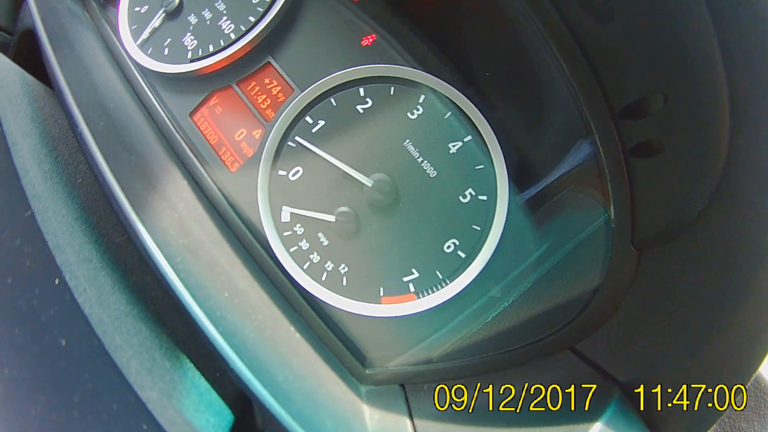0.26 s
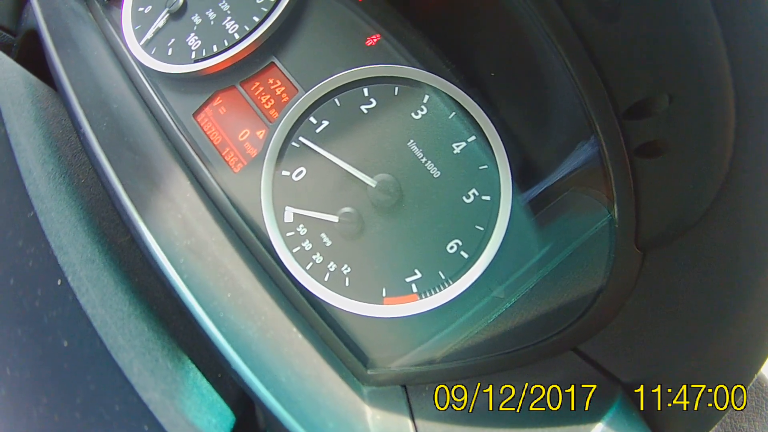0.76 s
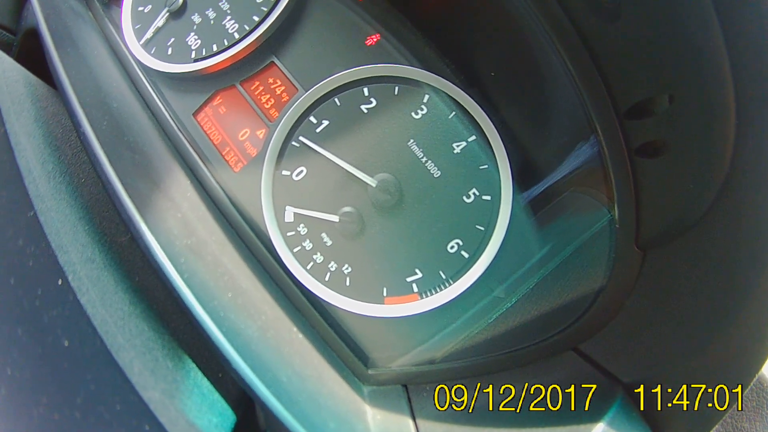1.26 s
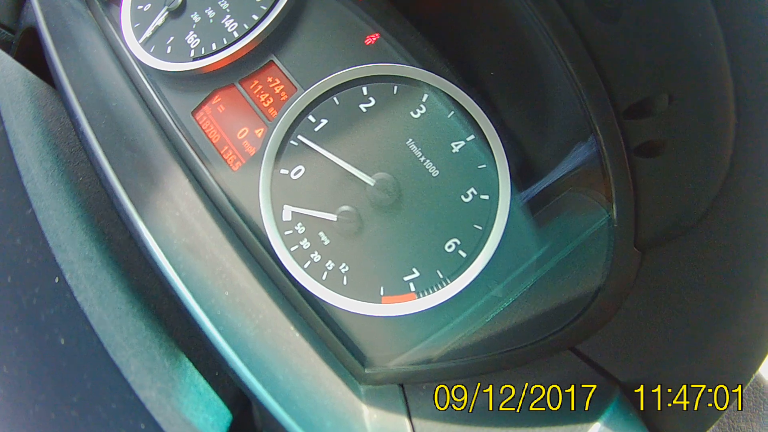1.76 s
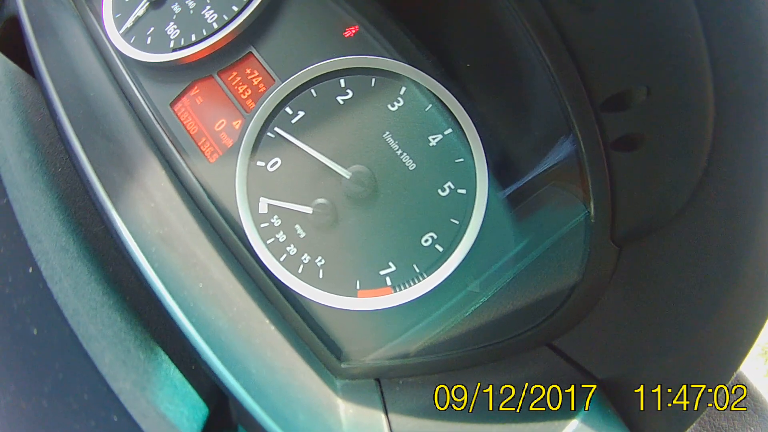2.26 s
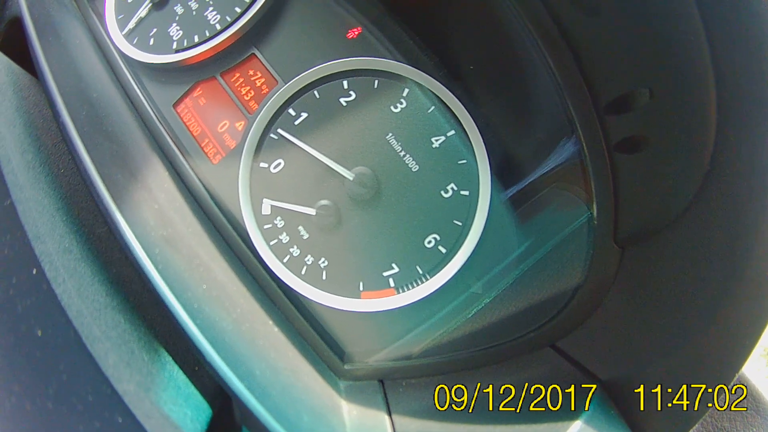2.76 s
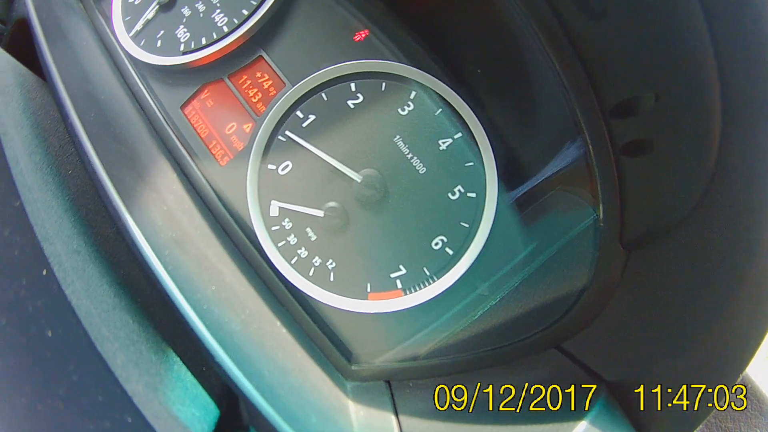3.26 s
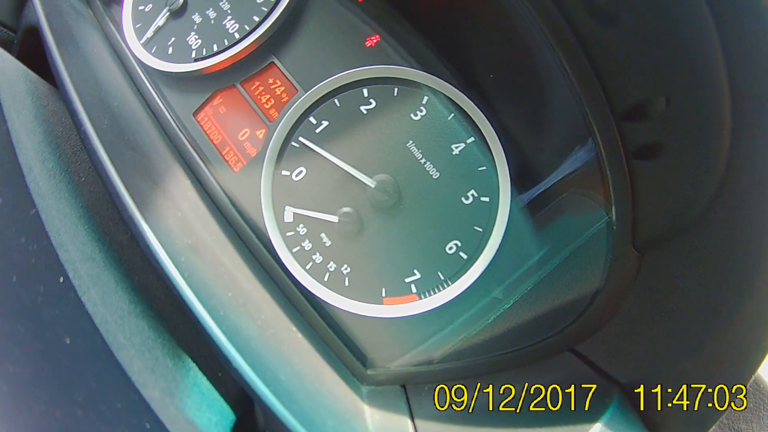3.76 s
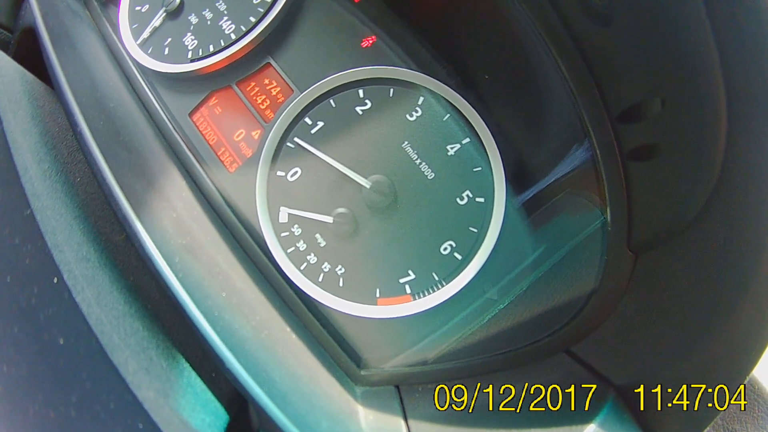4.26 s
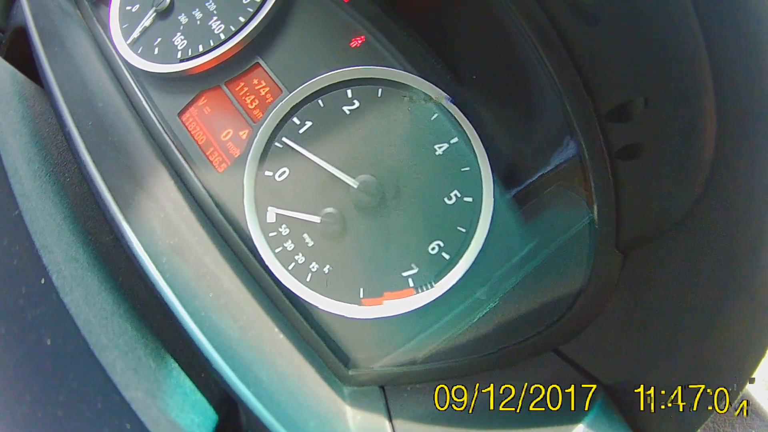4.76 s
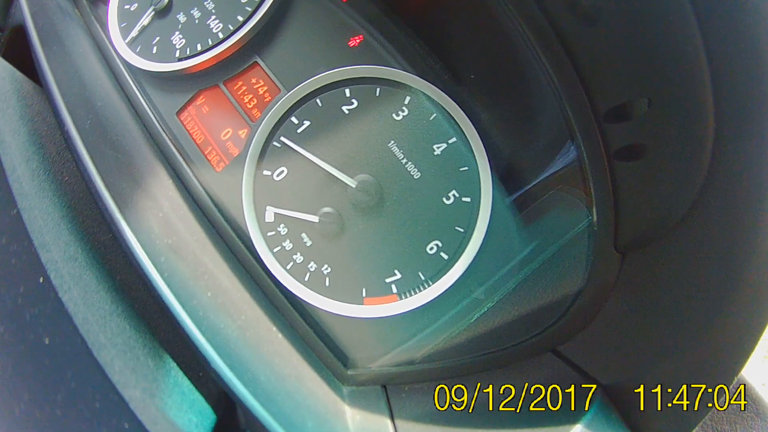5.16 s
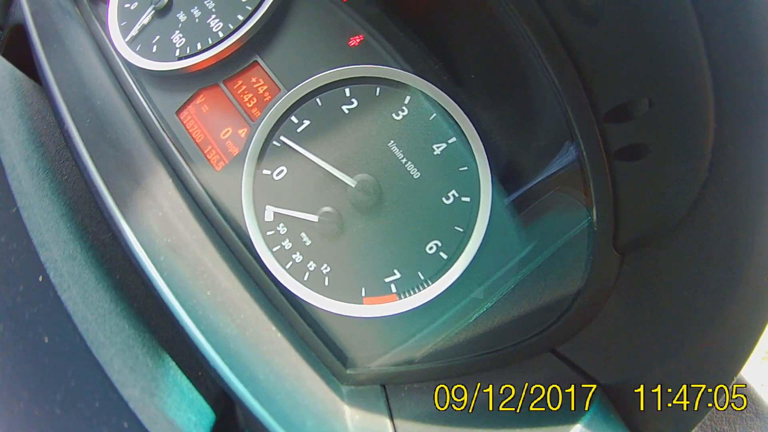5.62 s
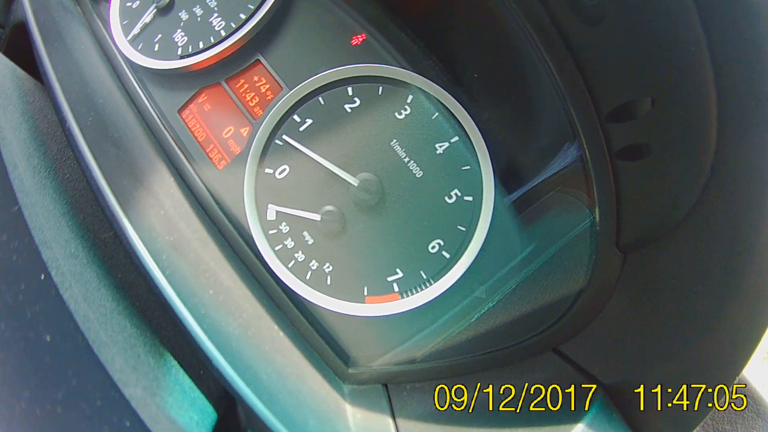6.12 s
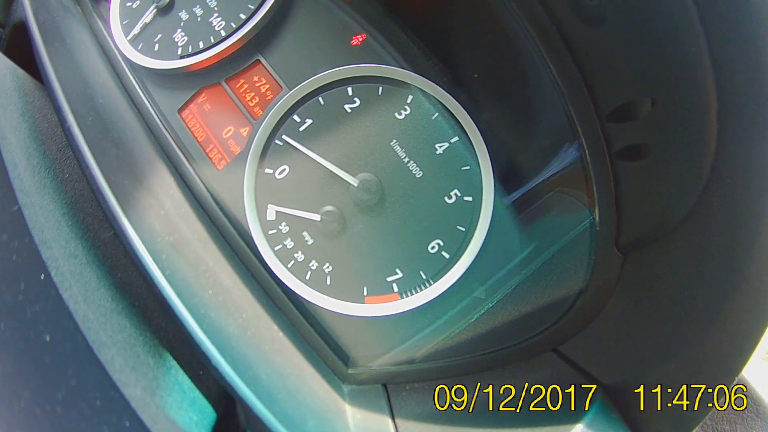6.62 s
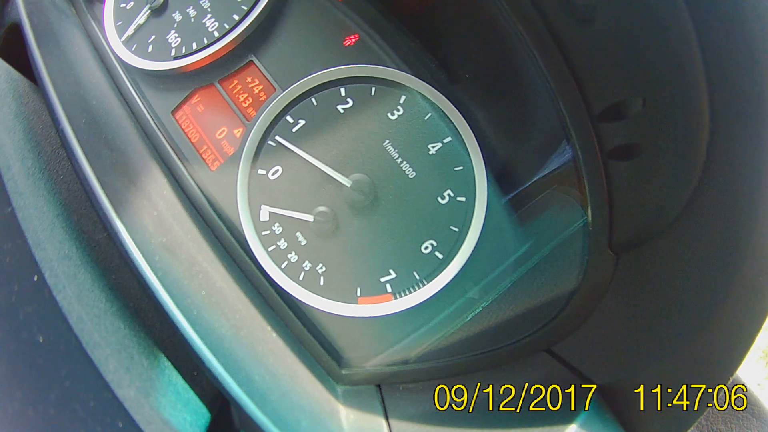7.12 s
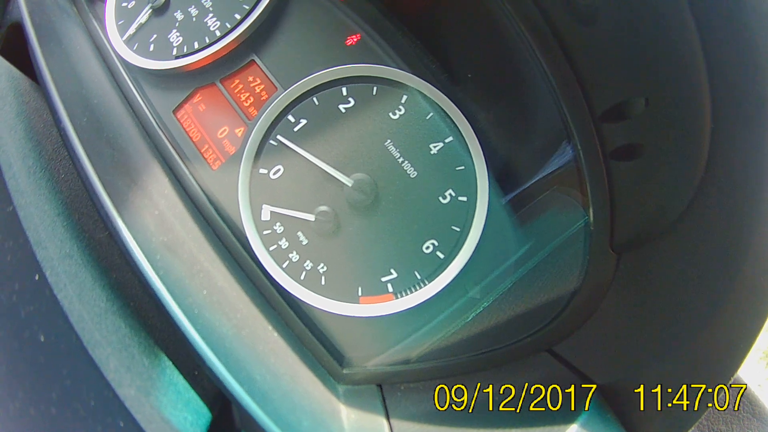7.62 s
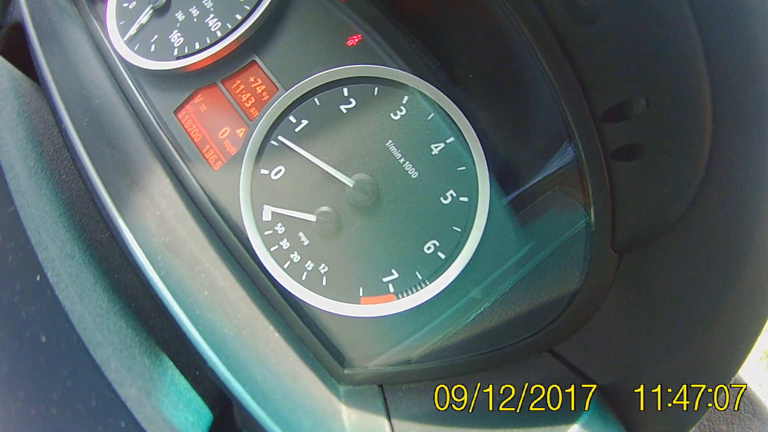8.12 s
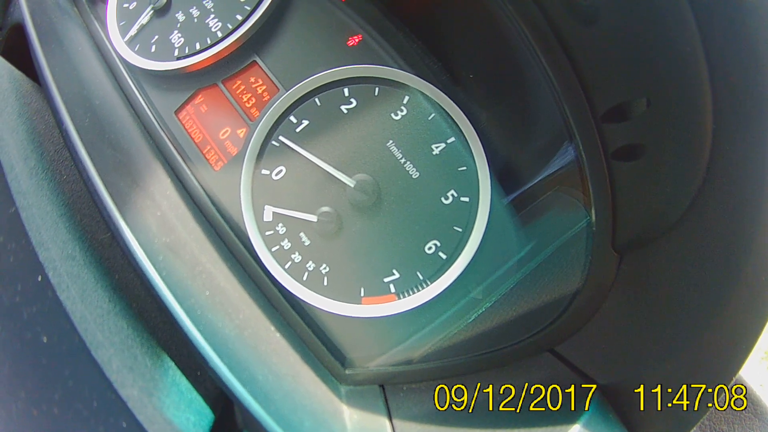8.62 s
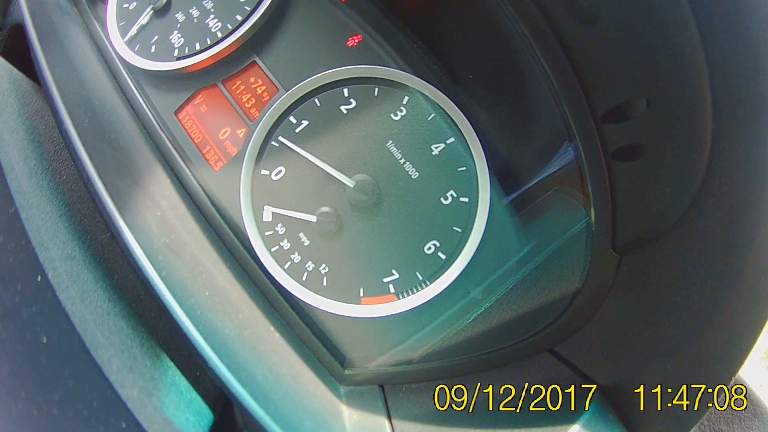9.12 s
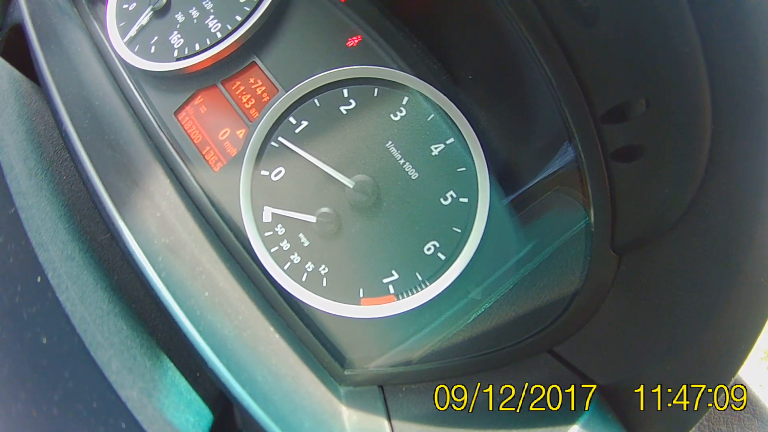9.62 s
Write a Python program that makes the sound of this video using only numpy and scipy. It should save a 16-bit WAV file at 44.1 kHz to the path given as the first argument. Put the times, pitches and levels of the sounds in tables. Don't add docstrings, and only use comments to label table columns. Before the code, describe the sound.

Inside a parked car, a six-cylinder engine idles with a low throbbing rumble, heard loudly by a small camera microphone. Tiny mechanical ticks sound from the start. Soon a hard thump and crackle drop the idle to a much quieter level. Plastic trim creaks a few times, more ticks follow, then a short burst of sharp digital crackle. Afterwards faint high motor whirrs come in short runs over the unbroken idle.

```python
import sys
import numpy as np
from scipy import signal
from scipy.fft import rfft, irfft, next_fast_len
from scipy.io import wavfile
from scipy.ndimage import uniform_filter1d

SR = 44100
rng = np.random.default_rng(int(sys.argv[2]) if len(sys.argv) > 2 else 0)


def wrap_up_sound(samples):
    columns = np.atleast_2d(samples).T
    tamed = np.clip(columns, -1, 1)
    steps = np.round(tamed * 32767).astype(np.int16)
    wavfile.write(sys.argv[1], SR, steps)


def convert_level_to_amplitude(level_db):
    exponent = np.asarray(level_db, float) / 20
    return 10 ** exponent


N = 435706
T = np.arange(N) / SR

# start_s, gain_db
INPUT_GAIN = [
    (0, 11.5),
    (1.38, 14),
    (1.405, 5.5),
    (1.46, 0),
    (9.88, -0.5),
]


def curve(rows):
    x, y = np.transpose(rows)
    return np.interp(T, x, y)


def walk(rate_hz):
    hold = int(SR / rate_hz)
    held = np.repeat(rng.standard_normal(N // hold + 1), hold)
    return 1.7 * uniform_filter1d(uniform_filter1d(held, hold), hold)[:N]


def coloured(points, rms_db, peaks=(), split_hz=()):
    size = next_fast_len(N)
    hz = np.maximum(np.fft.rfftfreq(size, 1 / SR), 1)
    point_hz, point_db = np.transpose(points)
    shape_db = np.interp(np.log(hz), np.log(point_hz), point_db, left=-90)
    for centre_hz, width_hz, peak_db in peaks:
        shape_db = shape_db + peak_db / (1 + (2 * (hz - centre_hz) / width_hz) ** 2)
    gain = convert_level_to_amplitude(shape_db)
    spectrum = rfft(rng.standard_normal(size)) * gain
    spectrum = spectrum * convert_level_to_amplitude(rms_db) / np.sqrt(np.mean(gain ** 2))
    shares = [1]
    if len(split_hz):
        shares = [np.interp(np.log(hz), np.log(split_hz), one) for one in np.eye(len(split_hz))]
    return [irfft(spectrum * share, size)[:N] for share in shares]


def tone(turns, rms_db, wobble_db, wobble_rad, rate_hz):
    level = np.sqrt(2) * convert_level_to_amplitude(rms_db + wobble_db * walk(rate_hz))
    return level * np.cos(2 * np.pi * turns + wobble_rad * walk(rate_hz))


def ring(length, hz, t60_s, rise_s):
    t = np.arange(length) / SR
    return (1 - np.exp(-t / rise_s)) * convert_level_to_amplitude(-60 * t / t60_s) * np.sin(2 * np.pi * hz * t)


def add(out, start_s, sound):
    i = int(start_s * SR)
    out[i:i + len(sound)] += sound[:N - i]


def engine():
    # time_s, crank_rpm
    idle = [(0.0, 666.0), (0.8, 658.4), (2.24, 665.3), (2.63, 653.2), (3.37, 666.2), (3.95, 657.3),
            (4.5, 658.8), (4.72, 664.6), (5.32, 654.1), (5.85, 660.4), (6.82, 655.0), (7.36, 664.1),
            (7.68, 658.0), (8.09, 665.7), (8.49, 658.1), (8.97, 662.1), (9.28, 652.9), (9.88, 667.1)]
    # crank_multiple, start_level_db, end_level_db
    crank_orders = [(2, -51, -54), (3, -55, -55), (3.5, -59, -63), (4, -55, -61), (4.5, -52, -52),
                    (6, -44, -48), (7.5, -45, -44.5), (8, -53, -59), (9, -45.5, -46), (10.5, -62, -61),
                    (11, -60, -60), (12, -55, -54), (15, -52, -57), (16, -61, -61)]
    body_lag = [(2, -6.9), (3, -3.5), (4.5, -2.2), (6, .2), (7.5, 1.85), (9, 4.8), (12, 14.1), (16, 31.8)]
    # pitch_hz, level_db
    pump_tones = [(140, -53.5), (453, -63.5)]
    # freq_hz, density_db
    rumble = [(12, -29), (20, -4.5), (91, -3.5), (172, -7.5), (301, -20), (410, -20.5), (485, -23),
              (558, -17), (718, -26), (897, -27.5), (1530, -33.5), (1960, -46.5), (3840, -57.5),
              (13900, -74), (16000, -71)]
    # freq_hz, width_hz, peak_db
    panels = [(54.6, 5.9, -5.5), (111, 18, -6.5), (151.4, 8.2, -5), (181, 22, 2), (195, 10, -3),
              (204.5, 18, 2), (242, 10, -3), (255.4, 21, 5.5), (404, 83, 2.5), (530, 32, 1),
              (871, 140, 4.5), (1324, 17, 7.5), (1565, 75, 4.5), (2400, 150, 1), (3890, 410, 7.5)]
    # freq_hz, width_hz, peak_db
    valleys = [(26, 6, -7), (75, 9, -6), (94, 9, -5), (124, 10, -3), (705, 40, -3), (1050, 40, 3),
               (1100, 50, -5)]
    # time_s, change_db
    swell = [(0.0, -0.27), (9.88, 0.67)]

    crank_turns = np.cumsum(curve(idle)) / 60 / SR
    lag_multiple, lag_rad = np.transpose(body_lag)
    out = np.zeros(N)
    for multiple, start_db, end_db in crank_orders:
        turns = multiple * crank_turns + np.interp(multiple, lag_multiple, lag_rad) / (2 * np.pi)
        out += tone(turns, start_db + (end_db - start_db) * T / T[-1], 1.1, .12, 1.5)
    for hz, level_db in pump_tones:
        out += tone(hz * T, level_db, 1.5, .5, 4.0)
    out += tone(36.72 * crank_turns, -55.5, 1.05, .36, 14.0)
    swell_db = curve(swell)
    for band in coloured(rumble, -42.5, panels + valleys, split_hz=25 * 2. ** np.arange(9)):
        out += band * convert_level_to_amplitude(swell_db + .18 * walk(9.0))
    return out


def electronics():
    # freq_hz, density_db
    hiss = [(100, 0), (2000, 3), (5000, -1), (9000, -4), (14000, -4), (20000, -14)]
    # pitch_hz, level_db
    whine = [(13645, -94), (13697.5, -89), (13749.8, -79.5), (13802, -92), (11966, -97), (12018, -96),
             (15482, -98)]
    return coloured(hiss, -64.5)[0] + sum(tone(hz * T, level_db, .8, .2, 3.0) for hz, level_db in whine)


def focus_motor():
    # start_s, strength_db
    steps = [(.1446, 2), (.2947, 2), (.4808, 1.5), (.568, 0), (.6669, -3), (.9348, 0), (1.0286, -1),
             (1.1129, -1), (1.213, -2.5), (1.2984, -1), (1.4755, 0), (1.6561, 0), (1.8751, 0), (3.2859, 0),
             (3.3553, -2), (3.6537, 0.5), (3.713, 0), (3.8357, 1), (3.922, -1), (4.0173, 2.5), (4.1979, 1),
             (4.3236, 0.5), (4.4448, 1.5)]
    # start_s, strength_db, second_delay_s, second_strength_db
    reversals = [(.0263, -1, .0302, 1), (.7572, 0, .0349, -4), (1.5747, -2, .0251, -2),
                 (1.7165, 0, .0234, 1), (2.7142, 1, .022, 0), (2.8345, -1, .0239, -1), (3.3737, 2, .011, 0),
                 (3.4331, -3, .0349, 0), (3.538, 0, .0228, -1), (4.0821, 1, .0245, 2)]
    # pitch_hz, level_db, t60_s
    tick_modes = [(3810, 0, .010), (4550, -4, .004), (5400, -5, .006), (6300, -6, .0045), (1600, -5, .008)]
    # start_s, end_s
    whirr_runs = [(5.16, 5.23), (5.36, 5.43), (5.805, 5.87), (6.09, 6.17), (6.325, 6.39), (6.795, 6.86),
                  (6.925, 6.985), (7.295, 7.385), (7.53, 7.6), (7.8, 7.875), (8.12, 8.19), (8.32, 8.37)]
    # freq_hz, density_db
    whirr = [(8000, -30), (9900, -13), (10350, 0), (10750, -11), (12000, -8), (13050, -3), (13700, -11),
             (14300, -11), (14750, -2), (15250, -11), (17000, -30)]
    peak_db, gain_share = -44.5, .61

    out, gain_db = np.zeros(N), curve(INPUT_GAIN)
    ticks = list(steps)
    for start_s, first_db, delay_s, second_db in reversals:
        ticks += [(start_s, first_db), (start_s + delay_s, second_db)]
    for (start_s, strength_db), chance in zip(ticks, rng.standard_normal((len(ticks), 12))):
        tick_db = strength_db + peak_db + gain_share * gain_db[int(start_s * SR)]
        for k, (hz, mode_db, t60_s) in enumerate(tick_modes):
            spread = 1 if k else .25
            mode = ring(900, hz * (1 + .015 * spread * chance[k]), t60_s, .0006)
            add(out, start_s + .0004, convert_level_to_amplitude(tick_db + mode_db + 1.7 * spread * chance[-1 - k]) * mode)

    running = sum((T > start_s) & (T < end_s) for start_s, end_s in whirr_runs) * 1.
    running = uniform_filter1d(running, size=500)
    bands = coloured(whirr, -71.0, split_hz=(10300, 11800, 13000, 14700))
    return out + running * sum(band * convert_level_to_amplitude(1.2 * walk(8.0)) for band in bands)


def gain_switch():
    # time_s, bias_full_scale
    swing = [
        (1.355, 0),
        (1.372, -.22),
        (1.388, -.2),
        (1.406, .31),
        (1.416, .1),
        (1.429, .07),
        (1.44, -.37),
        (1.452, -.45),
        (1.495, -.08),
    ]
    # start_s, end_s, start_bias, end_bias
    stalls = [
        (1.3766, 1.3868, -.4, -.275),
        (1.389, 1.39238, -.3, -.26),
        (1.39238, 1.405, .48, .41),
    ]
    jump_s, jump_size, jump_rise_s = 1.39238, .74, .00008

    stalled, limit = np.zeros(N), np.zeros(N)
    for start_s, end_s, start_bias, end_bias in stalls:
        inside = (T > start_s) & (T <= end_s)
        stalled += inside
        limit += inside * np.interp(T, (start_s, end_s), (start_bias, end_bias))
    bias = np.where(stalled > 0, limit, curve(swing))
    slow = uniform_filter1d(bias - jump_size * (T > jump_s), size=50)
    fast = uniform_filter1d(np.clip((T - jump_s) / jump_rise_s + .5, 0, 1), size=2)
    return slow + jump_size * fast, uniform_filter1d(1. - stalled, size=40)


def trim():
    # start_s, peak_db, low_ring_hz, high_ring_hz, high_ring_db
    creaks = [
        (1.8995, -48, 1350, 2050, 4),
        (1.99, -40, 1170, 2200, -13),
        (2.1185, -39.5, 950, 2120, 2),
        (3.7995, -38.5, 1050, 2120, 0),
        (6.689, -54, 1300, 2050, 8),
    ]
    out = np.zeros(N)
    for (start_s, peak_db, low_hz, high_hz, high_db), chance in zip(creaks, rng.random((len(creaks), 2))):
        high = sum(ring(2000, share * high_hz, .013, .0006) for share in (.7, .93, 1.03))
        slip = ring(2000, low_hz, .014, .0005) + convert_level_to_amplitude(high_db - 5) * high
        for lag_s, drop_db in ((0, 0), (.0024 + .0006 * chance[0], -7), (.0047 + .001 * chance[1], -8)):
            add(out, start_s + lag_s, convert_level_to_amplitude(peak_db + drop_db) * slip)
    return out


def garbled():
    # start_s, end_s
    block_s = (4.6316, 4.658)
    flips_per_bit = (10, 5, 9, 4)
    # time_s, sign
    top_flips = [(4.6334, -1), (4.63442, -1), (4.63748, 1), (4.64236, -1), (4.64569, -1), (4.64612, -1),
                 (4.64893, 1), (4.65152, 1), (4.65474, 1), (4.65658, 1), (4.65728, 1), (4.658, -1)]

    start_s, end_s = block_s
    bit = rng.permutation(np.repeat(2 + np.arange(len(flips_per_bit)), flips_per_bit))
    slot, chance = rng.random((len(bit), 2)).T
    flip_s = start_s + (end_s - start_s) * (np.arange(len(bit)) + slot) / len(bit)
    errors = np.zeros(N)
    errors[(flip_s * SR).astype(int)] = np.sign(chance - .5) * convert_level_to_amplitude(4.5) / 2 ** bit
    top_s, top_sign = np.transpose(top_flips)
    errors[np.round(top_s * SR).astype(int)] = top_sign * convert_level_to_amplitude(2.5) / 2
    block = (T > start_s) & (T < end_s + .0006)
    low_bits = convert_level_to_amplitude(-33) * rng.standard_normal(N) * (rng.random(N) < .15)
    return errors + block * low_bits


def cut(x, top_hz):
    return signal.sosfiltfilt(signal.ellip(8, .1, 40, top_hz, fs=SR, output="sos"), x)


def scene():
    return (engine() * convert_level_to_amplitude(curve(INPUT_GAIN)) + focus_motor() + trim())[None]


def top_cut(x):
    return signal.sosfilt(signal.butter(12, 17140, fs=SR, output="sos"), x)


def record(dry):
    bias, live = gain_switch()
    fade_in = np.minimum(T / .00077, 1)
    x = (dry + electronics() * convert_level_to_amplitude(.15 * curve(INPUT_GAIN))) * live * fade_in + bias
    coupling_hz = 12
    x = signal.lfilter([1, -1], [1, -np.exp(-2 * np.pi * coupling_hz / SR)], x)
    mix = cut(x, 15690) + cut(garbled(), 16200)
    return top_cut(mix)


dry = scene()
out = record(dry)
wrap_up_sound(out)
```